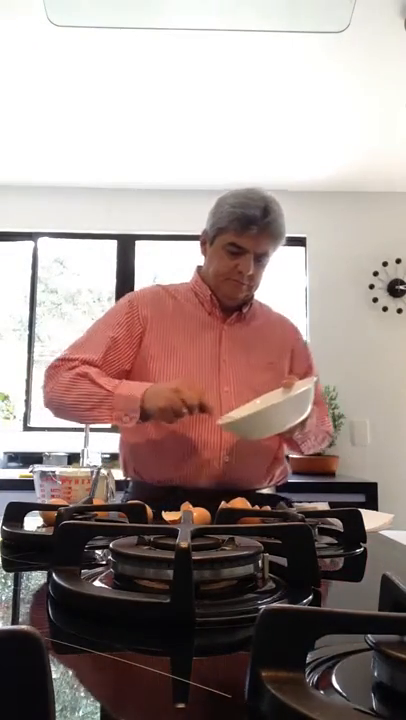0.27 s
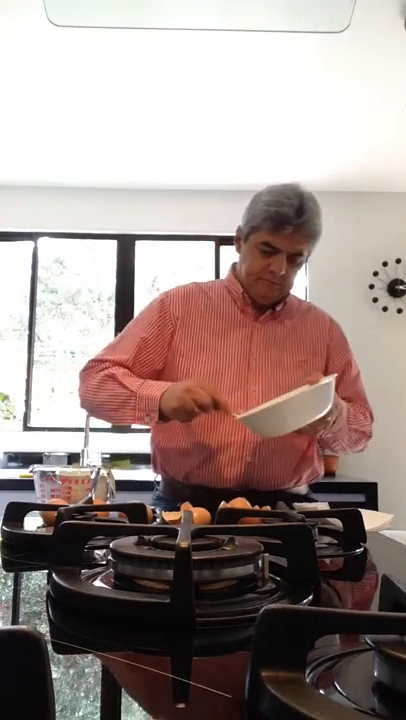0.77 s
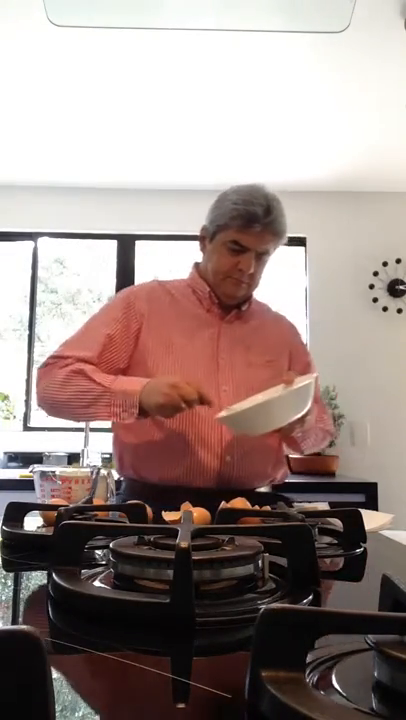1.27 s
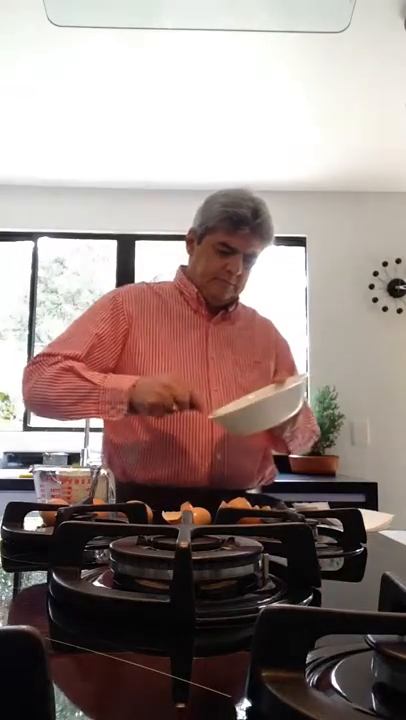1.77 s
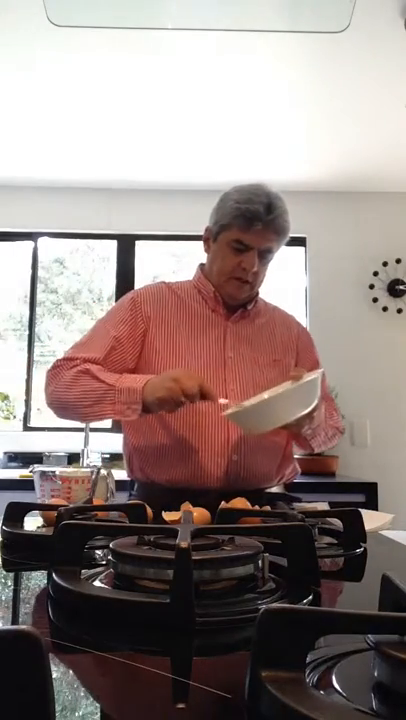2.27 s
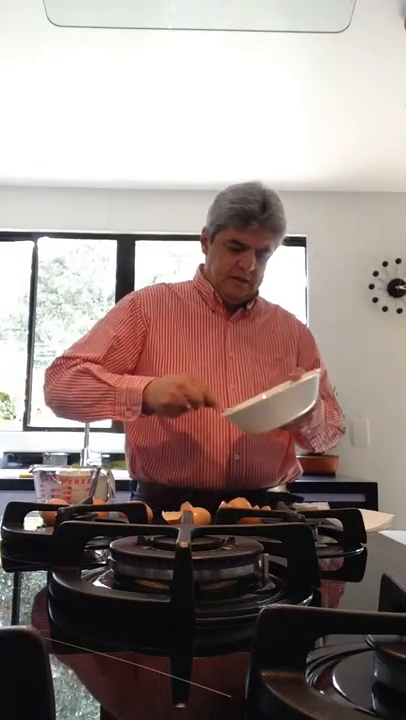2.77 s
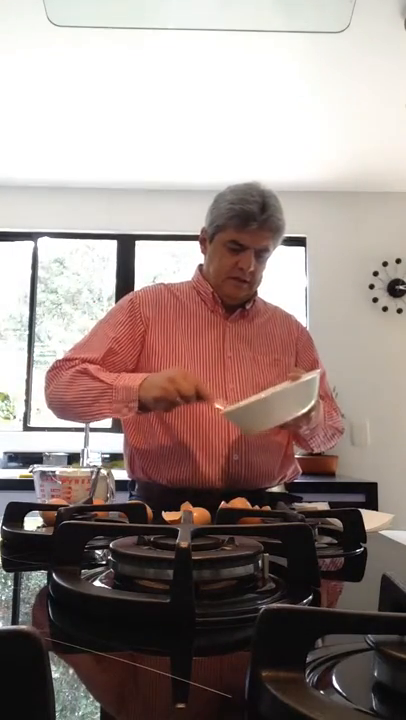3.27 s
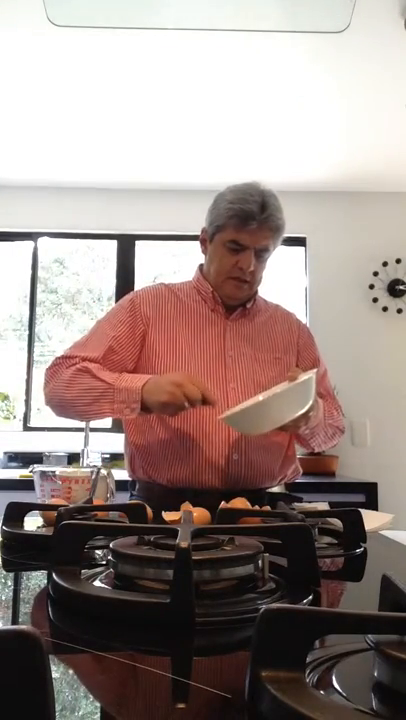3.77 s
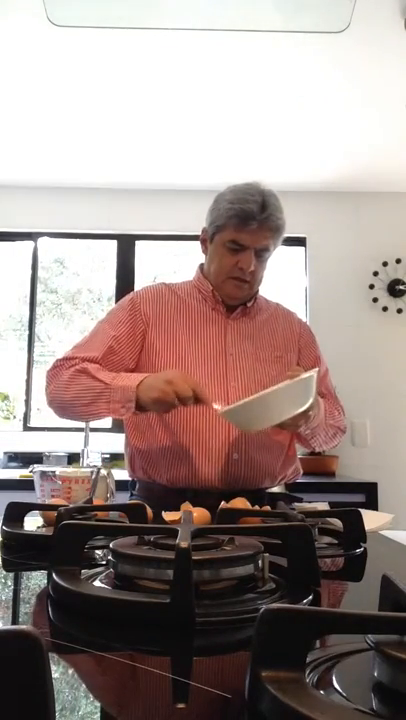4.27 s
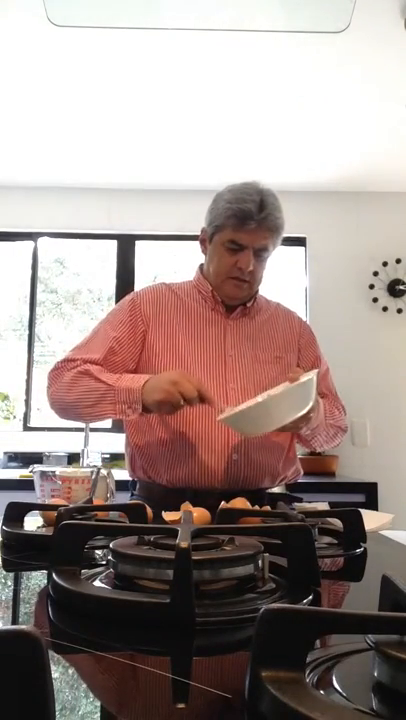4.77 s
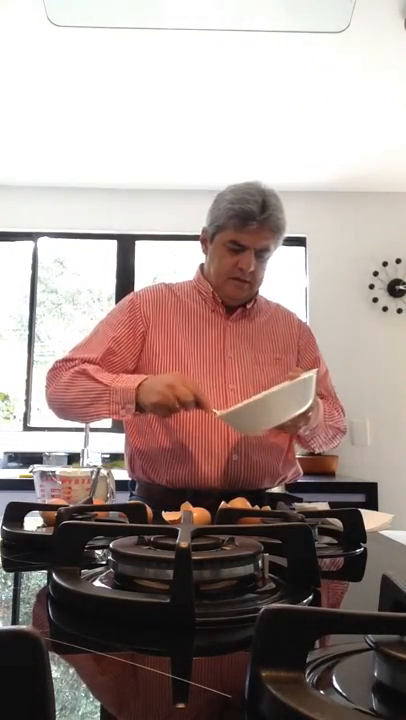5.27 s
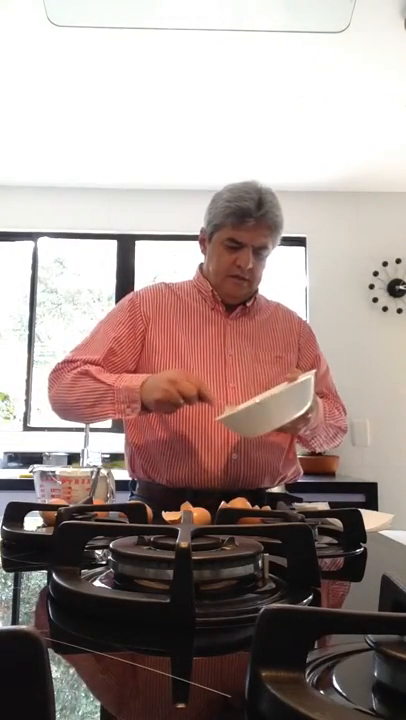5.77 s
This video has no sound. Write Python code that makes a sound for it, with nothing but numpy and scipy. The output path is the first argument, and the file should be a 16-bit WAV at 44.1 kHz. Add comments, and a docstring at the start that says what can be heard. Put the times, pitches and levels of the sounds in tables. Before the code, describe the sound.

Rapid, steady fork beating in a ceramic bowl: sharp ticking clinks, small liquid splashes and bubbly plops over faint room hum.

```python
"""Whipping egg whites in a ceramic bowl

A fork whips egg whites about five times a second in a hard, bright kitchen. Air pockets often plop first,
as short rising tones; then filtered tine ticks clatter, dying sines ring the bowl and grains of noise splash.
Echoes and a diffuse tail draw out each click. Shaped noise makes the room air and a faint appliance hum;
short sinking tones make a few dull thuds."""
import sys
import numpy as np
from scipy import signal
from scipy.fft import rfft, irfft
from scipy.io import wavfile

SR = 44100
rng = np.random.default_rng(int(sys.argv[2]) if len(sys.argv) > 2 else 0)


def dump_mix(stems):
    """Bounce the given channels to the path in sys.argv[1] as a 16-bit WAV at rate SR."""
    frames = np.atleast_2d(stems).T  # one column per channel
    limited = np.clip(frames, -1, 1)  # hard clip at full scale
    pcm = np.round(limited * 32767).astype(np.int16)
    wavfile.write(sys.argv[1], SR, pcm)


N = 265702


def stroke(level_db, tilt_db, splash_db, ring_db, hollow_db, ping_db):
    """The tines tick and scrape on briefly; the egg splashes, the bowl rings and the room booms."""
    # clatter spectrum: (frequency [Hz], relative level per Hz [dB])
    clatter_spectrum = [(120, -48), (250, -25.5), (763, -10), (1480, -9), (1900, -19.5), (2250, -13.5),
                        (4040, -14.5), (4350, -8.5), (5230, -10.5), (6280, -8), (8900, 0), (10800, 1.5),
                        (11400, -7), (12200, 0), (14100, -4.5), (16000, -11)]
    # bowl modes, one list a group, close pairs beat: (frequency [Hz], relative level [dB], t60 [s])
    bowl_groups = [
        [(779.6, 6.5, 0.054), (807.7, 7, 0.063), (849.3, 2.5, 0.17)],
        [(1265, 2, 0.017), (1484, 9.5, 0.028)],
        [(2286, 6.5, 0.069), (2484, 3.5, 0.031), (2730, -0.5, 0.043)],
        [(3266, 5, 0.16), (3806, 3.5, 0.051)],
        [(4390, -0.5, 0.15), (4434, 1.5, 0.078), (5000, -4, 0.02)],
        [(5770, -14, 0.058), (5715, 5, 0.086), (5669, 10, 0.038)],
        [(6870, -2, 0.04), (7106, 3, 0.039), (7450, -9.5, 0.036), (7920, 0, 0.046), (8250, -9, .04)],
        [(8806, 3.5, 0.025), (9105, 1.5, 0.018), (9104, 5.5, 0.018), (9970, -0.5, 0.028), (10280, -3.5, 0.037),
         (11020, -11, 0.051), (11920, -8.5, 0.035), (13360, -6.5, 0.021), (14420, -5, 0.019)],
    ]
    # usual ring of each mode group against the clatter: (level [dB])
    usual_ring_db = [-29.5, -28, -31.5, -36, -26.5, -22, -19, -16.5]
    # low room resonances: (frequency [Hz], relative level [dB], t60 [s])
    boom_modes = [(282.4, 5, 0.13), (299.8, -3, 0.48), (313.5, 8.5, 0.24), (345.3, 5, 0.13),
                  (397.5, 5.5, 0.19), (416, 13.5, 0.11), (500.6, -4.5, 0.22)]
    hollow_group, ping_group = 0, 3
    group_spread_db = 2  # each group's level varies at random from blow to blow
    boom_db, boom_per_db = -37, 0.88  # boom grows a little less than the blow
    lead_samples = 200  # room for the filters to spread ahead of the blow

    t = np.arange(round(.5 * SR)) / SR
    ticks = rng.standard_normal(len(t)) * (rng.random(len(t)) < .15)
    tines = ticks * (np.exp(-t / 0.0039) + 0.17 * np.exp(-t / 0.029))
    tines[0] = 1.66
    tines = np.roll(tines, lead_samples) / np.linalg.norm(tines)
    tilt = [(6000, 0.028), (12000, tilt_db)]
    clatter = coloured(tines, lambda hz: read(clatter_spectrum, hz) + read(tilt, hz))
    out = gain_of(20.5) * clatter + gain_of(splash_db - level_db) * splash(t)

    group_db = ring_db + np.array(usual_ring_db)
    group_db = group_db + group_spread_db * rng.standard_normal(len(bowl_groups))
    group_db[hollow_group] += hollow_db
    group_db[ping_group] += ping_db
    bowl = np.zeros(len(t))
    for db, modes in zip(group_db, bowl_groups):
        bowl += gain_of(db) * ring(modes, t, uneven_db=1.5, rise_cycles=6.1, load=0.05945, flutter_db=2.5)
    out[lead_samples:] += bowl[:-lead_samples]

    out = signal.fftconvolve(out, kitchen(wet_db=-1.0))
    boom = ring(boom_modes, t, uneven_db=0.5, rise_cycles=5.4, load=0, flutter_db=0)
    boom_gain = gain_of(boom_db + (boom_per_db - 1) * level_db)
    out[lead_samples:lead_samples + len(t)] += boom_gain * boom
    return lead_samples / SR - .0004, gain_of(level_db) * out


def ring(modes, t, uneven_db, rise_cycles, load, flutter_db):
    """Sum dying sines whose levels, pitches and phases vary from blow to blow."""
    hz, db, t60_s = np.transpose(modes)[:, :, None]
    chance, shift, phase_cycles = rng.standard_normal((3, *hz.shape))
    rise = 1 - np.exp(-t * hz / rise_cycles)

    # each mode's level wavers irregularly as it dies
    flutter_s = .012
    knots = rng.standard_normal((len(hz), 100))
    waver = np.array([np.interp(t / flutter_s, np.arange(len(row)), row) for row in knots])

    # egg weighs on the low modes at the blow, then slides off and their pitch climbs
    slide_s = 0.0604
    slide = load * (800 / hz) ** 2 * slide_s * np.exp(-t / slide_s)
    cycles = hz * (1 + 0.002 * shift) * (t + slide) + phase_cycles
    tones = np.sin(2 * np.pi * cycles)
    mode_db = db + uneven_db * chance + flutter_db * waver - 60 * t / t60_s
    return (rise * gain_of(mode_db) * tones).sum(0)


def splash(t):
    """Small bubbles in the froth burst in a grainy spray around a few pitches."""
    # spray resonances: (frequency [Hz], width [Hz], relative level [dB])
    froth_bands = [(1290, 53, -1.5), (1998, 134, 3.5), (2720, 220, -1.5), (4930, 850, 0.5),
                   (8000, 3500, -25.5)]
    grains = rng.standard_normal(len(t)) * (rng.random(len(t)) < .06)
    grains = grains * np.exp(-t / 0.011) * (t > .004)

    def froth_db(hz):
        return 20 * np.log10(sum(gain_of(db) / (1 + (2 * (hz - f) / w) ** 2) for f, w, db in froth_bands))

    spray = coloured(grains, froth_db)
    return spray / abs(spray).max()


def plop(level_db, start_hz):
    """A pocket of air rings for a few cycles, its pitch rising as it shrinks."""
    t = np.arange(0, .05, 1 / SR)
    tone = np.sin(2 * np.pi * start_hz * t * (1 + 17.5 * t))
    bubble = tone * (1 - np.exp(-t / 0.0026)) * np.exp(-t / 0.0031)
    return signal.fftconvolve(gain_of(level_db) * bubble, kitchen(wet_db=-18.0))


def kitchen(wet_db):
    """Room response: direct sound, a few echoes and a dense tail that dies band by band."""
    # tail decay: (frequency [Hz], t60 [s])
    decay = [(200, 0.54), (530, 0.49), (1390, 0.46), (3680, 0.58), (9700, 0.36)]
    # counter, cupboards, walls: (nominal delay [s], level [dB])
    echoes = [(.0017, -10.5), (.0044, -5), (.0075, -15), (.012, -21.5), (.018, -8.5)]
    size = 30000
    hz, t, bins = signal.stft(rng.standard_normal(size), SR, nperseg=256)
    fade = gain_of(-60 * t / read(decay, hz)[:, None])
    tail = signal.istft(bins * fade, SR, nperseg=256)[1][:size]
    tail *= 1 - np.exp(-np.arange(size) / SR / 0.0024)
    room = gain_of(wet_db) * tail / np.linalg.norm(tail)
    room[0] = 1
    for delay_s, db in echoes:
        at = round(delay_s * SR * rng.uniform(.9, 1.1))
        room[at] += gain_of(db) * rng.choice([-1, 1])
    return room


def thud(level_db, nominal_hz, length_s):
    """A short low swell that sinks in pitch."""
    t = np.arange(0, length_s, 1 / SR)
    tone = np.sin(2 * np.pi * nominal_hz * t * (1.06 - 0.11 * t / length_s))
    return gain_of(level_db) * tone * np.sin(np.pi * np.sqrt(t / length_s))


def air():
    """Steady room noise and fuzzy hum bands, all from filtered white noise."""
    # room noise spectrum: (frequency [Hz], relative level per Hz [dB])
    air_spectrum = [(20, -50), (40, -6), (80, 2.5), (200, 8), (400, 6.5), (800, -10), (1800, -6.5),
                    (5500, -30), (9000, -38), (15000, -55)]
    # hum bands: (centre [Hz], width [Hz], RMS level [dB])
    hum_bands = [(73, 35, -75.5), (132, 12, -64), (182, 33, -69.5)]
    air_rms_db = -60
    noise = coloured(rng.standard_normal(N), lambda hz: read(air_spectrum, hz))
    out = gain_of(air_rms_db) * evened(noise)
    for centre_hz, width_hz, rms_db in hum_bands:
        def band_db(hz):
            return -20 * np.log10(1 + (2 * (hz - centre_hz) / width_hz) ** 2)

        out = out + gain_of(rms_db) * evened(coloured(rng.standard_normal(N), band_db))
    return out


def gain_of(db):
    """Amplitude gain of a level in dB."""
    return 10 ** (np.asarray(db) / 20)


def evened(x):
    """Scale to unit RMS."""
    return x / np.sqrt(np.mean(x ** 2) + 1e-20)


def read(points, hz):
    """Interpolate a curve along log frequency, flat beyond its ends."""
    f, value = np.transpose(points)
    return np.interp(np.log(hz + 1), np.log(f + 1), value)


def coloured(x, gain_db):
    """Filter without phase shift by a gain curve in dB, given as a function of Hz."""
    hz = np.fft.rfftfreq(len(x), 1 / SR)
    return irfft(rfft(x) * gain_of(gain_db(hz)), len(x))


def add(mix, start_s, sound):
    """Add a sound in place, cropped to the mix."""
    at = round(start_s * SR)
    sound = sound[max(-at, 0):]
    part = mix[max(at, 0):][:len(sound)]
    part += sound[:len(part)]


def scene():
    """Place strokes, plops and thuds over the room air."""
    # blows: (time [s], level [dB], treble tilt [dB], splash level [dB],
    # then against the usual: whole ring [dB], hollow lowest group [dB], thin 3.3 kHz ping group [dB])
    strokes = [(-.105, -8.5, -16, -33, 4.5, 2.5, -10), (.087, -4, -19, -25, 2.5, -4, -26),
               (.295, -9.5, -12.5, -33.5, -4.5, 7.5, 9.5), (.478, -1, -14.5, -40, -1, 6.5, -0.5),
               (.684, -24.5, -10, -29, -10, 14, -5), (0.878, -16, -12.5, -27.5, -4.5, 6, 9),
               (1.074, -17.5, -13, -38, -3.5, 12.5, 2), (1.255, -23.5, -14, -29, -15, 17, -8),
               (1.437, -7, -12, -30, 1, -5, -22), (1.631, -6, -17, -42, 0, -5, -13),
               (1.825, -4, -9, -46, 0, 2.5, -11), (2.019, -4, -12, -37, 0.5, -1, -0.5),
               (2.213, -18.5, -9.5, -31.5, 2, -6, 4.5), (2.392, -5.5, -7.5, -32, 1, 2, 2.5),
               (2.59, -8.5, -8, -32, 2, -3, -7), (2.784, -7.5, -10.5, -44, -0.5, 0, -20),
               (2.971, -3.5, -11.5, -29, 0, -4.5, -0.5), (3.174, -6.5, -8.5, -26, -1.5, 0, -5),
               (3.372, -2, -8.5, -41, -1.5, 6.5, 7), (3.571, -5, -12, -45, 2.5, -3, -4),
               (3.771, -7.5, -11, -29, -1.5, -4.5, -15), (3.971, -4.5, -13, -29, -0.5, 2, -18),
               (4.171, -11, -7, -44, 1, -6, -9), (4.367, -8, -13, -42, 0.5, -2.5, -6.5),
               (4.561, -6, -8.5, -35, 0.5, 3.5, -6), (4.762, -7.5, -15, -44, 4, -3.5, 6),
               (4.951, -6.5, -17, -47, 1.5, -0.5, 1), (5.141, -3, -18, -42, 2.5, 1.5, 2.5),
               (5.335, -3.5, -9.5, -34, 1.5, -2.5, -12), (5.537, -7, -13.5, -36, -1, -2, -9),
               (5.745, -8, -11, -26, 2.5, -11, -2.5), (5.941, -5, -9, -35, 2, 1, -7)]
    # air pockets opened in the egg, mostly just before a blow: (time [s], level [dB], starting pitch [Hz])
    plops = [(.083, -26, 513), (.286, -29.5, 457), (.66, -31.5, 576), (.862, -32.5, 460), (1.05, -38, 500),
             (1.248, -25.5, 634), (1.43, -28, 517), (1.822, -27, 524), (2.204, -33, 560),
             (2.387, -31.5, 490), (2.775, -39, 474), (2.961, -39, 450), (3.17, -20, 610), (3.764, -26, 644),
             (4.36, -33, 494), (4.554, -32, 520), (4.75, -26, 496), (5.532, -24, 625), (5.738, -39, 462)]
    # dull thuds: (time [s], level [dB], nominal pitch [Hz], length [s])
    thuds = [(0.96, -45, 89, 0.074), (1.744, -43.5, 107, 0.081), (4.766, -46, 190, 0.072),
             (4.773, -51.5, 110, 0.057)]
    mix = air()
    for time_s, *settings in strokes:
        lead_s, sound = stroke(*settings)
        add(mix, time_s - lead_s, sound)
    for time_s, *settings in plops:
        add(mix, time_s, plop(*settings))
    for time_s, *settings in thuds:
        add(mix, time_s, thud(*settings))
    return mix[None]


def record(dry):
    """Drop the treble steeply above 15 kHz, then band-limit it."""
    top = [(15250, 0), (15420, -24), (15800, -18)]  # (frequency [Hz], gain [dB])
    edge_hz = 16450
    rolled = coloured(dry[0], lambda hz: read(top, hz))[None]
    lowpass = signal.firwin(1023, edge_hz, window=("kaiser", 11), fs=SR)
    return signal.oaconvolve(rolled, lowpass[None], "same")


dry = scene()
out = record(dry)
dump_mix(out)
```